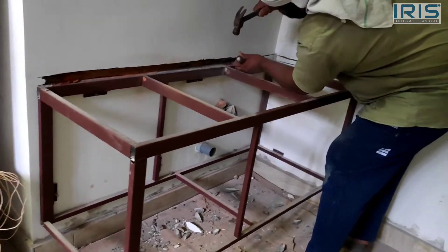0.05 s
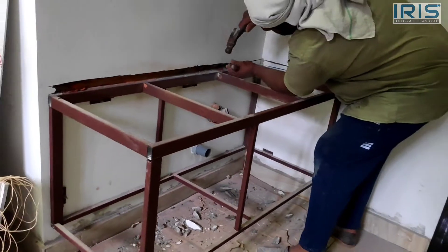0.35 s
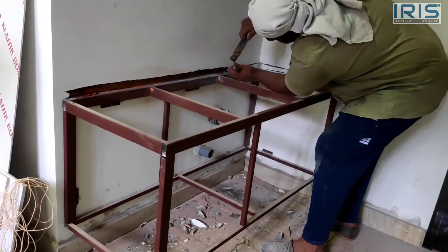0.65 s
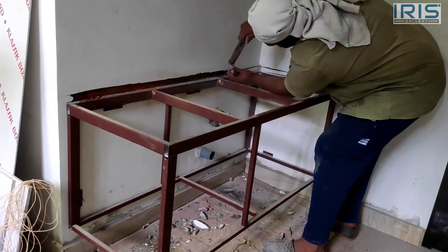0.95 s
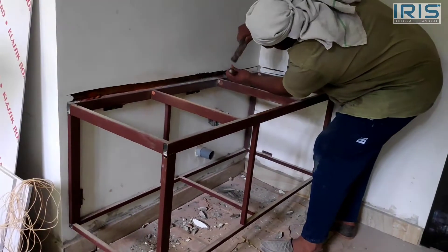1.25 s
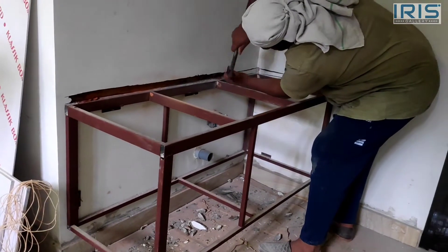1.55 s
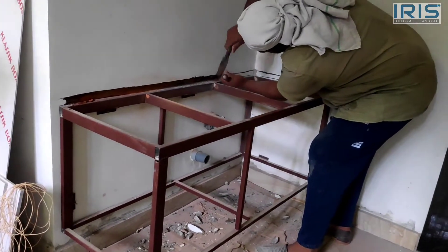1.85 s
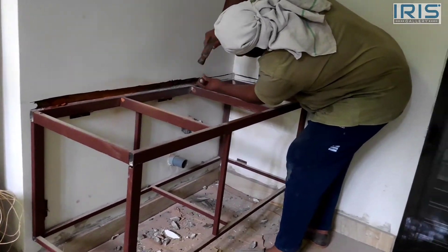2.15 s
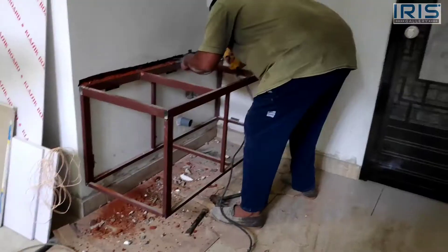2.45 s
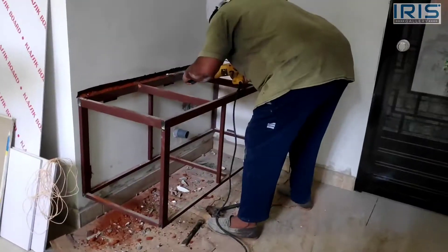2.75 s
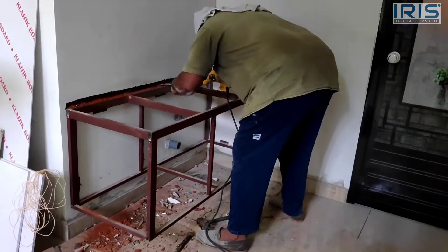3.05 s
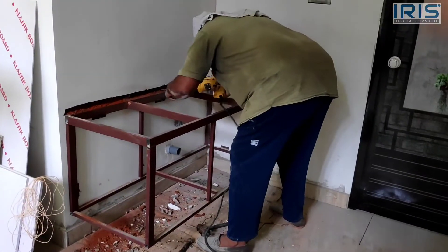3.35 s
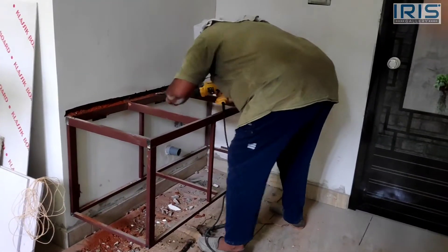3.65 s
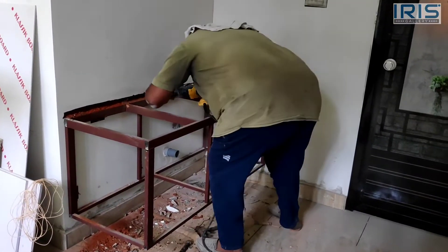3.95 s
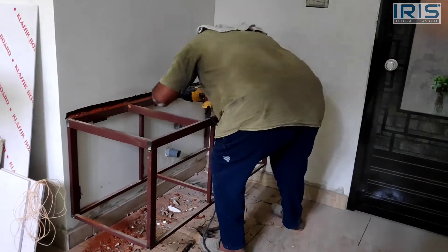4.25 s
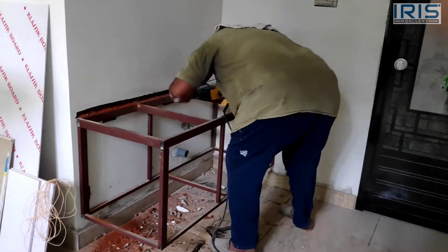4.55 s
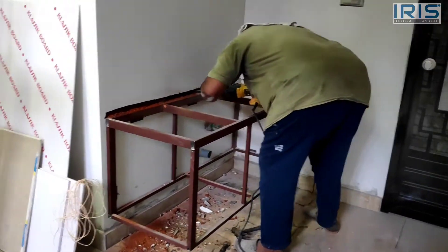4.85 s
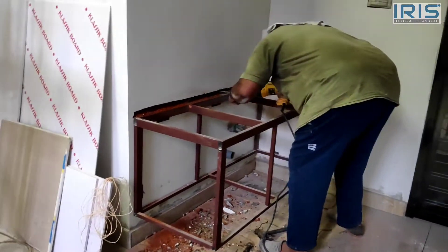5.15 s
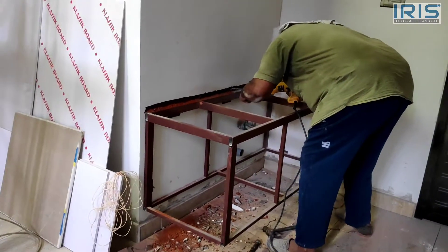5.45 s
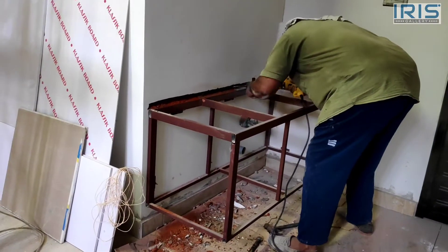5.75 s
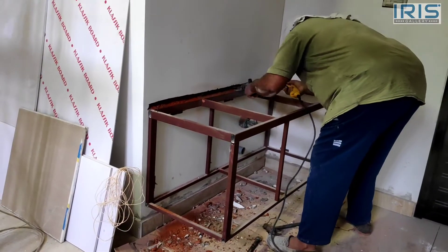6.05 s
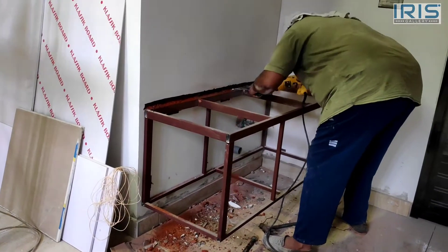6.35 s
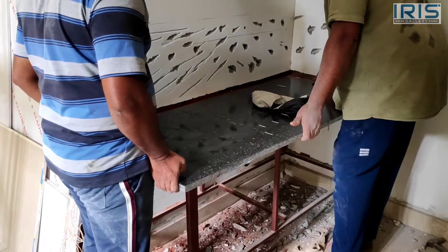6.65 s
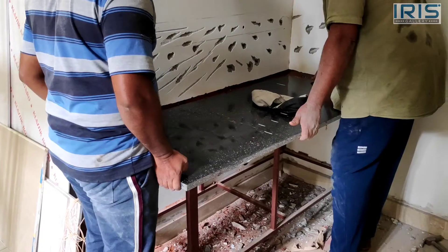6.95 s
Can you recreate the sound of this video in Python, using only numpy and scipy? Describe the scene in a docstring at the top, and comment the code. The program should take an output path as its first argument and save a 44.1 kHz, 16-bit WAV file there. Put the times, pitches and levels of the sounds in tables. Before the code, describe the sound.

In a bare, echoing room, a hammer drives a steel chisel into plaster: two lighter taps, then seven sharp, ringing blows at an even pace. After an abrupt cut, an angle grinder starts in three short bursts and one longer one, rasping against the wall and coasting down with a high, falling whine. Another cut leads to a stone slab scraping briefly over a gritty steel frame, juddering twice. Everything sounds fairly near.

```python
"""Workers fit a stone counter in a bare, echoing room, in three scenes that each end abruptly.
First a hammer drives a steel chisel into a plastered wall: plaster cracks and the chisel rings.
From 2.4 s an angle grinder runs in four bursts, its disc biting the wall and its motor coasting
down with a falling whine. Last, from 6.6 s, the stone slab is pushed over its steel frame,
scraping on grit and juddering twice."""
import sys
import numpy as np
from scipy import signal
from scipy.fft import rfft, irfft, next_fast_len
from scipy.io import wavfile
from scipy.ndimage import minimum_filter1d

SR = 44100
rng = np.random.default_rng(int(sys.argv[2]) if len(sys.argv) > 2 else 0)


def transcribe(signal):
    """Save signal, clipped to [-1, 1], as a 16-bit WAV file at the path in sys.argv[1]."""
    frames = np.atleast_2d(signal).T
    limited = np.clip(frames, -1, 1)
    pcm = np.round(limited * 32767).astype(np.int16)
    wavfile.write(sys.argv[1], SR, pcm)


N = 317065
TIME = np.arange(N) / SR
CUTOFF_HZ = 15450
FREE_TURNS_PER_S, SPIN_UP_S, COAST_S = 278, .065, 1.0   # the grinder's motor


# Where the grinder is heard. Each row: frequency in Hz, left minus right in dB.
GRINDER_BALANCE = [(60, 2), (150, -0.5), (380, 1), (950, -1.5), (2380, 0.5), (5980, 0.5), (15000, -8.5)]

def grinder(throb=0.033, boom_hz=352, gear_order=30):
    """The disc tears grit from the wall once a turn; gears and fan rush; the motor whines."""
    speed, current, load = motor()
    bite_gain, boom_gain, rush_gain, hiss_gain, whine_gain = grinder_levels(speed, current, load)
    turns = np.cumsum(speed * (1 + 0.0013 * drift(150))) / SR
    contact = 1 + throb * np.cos(2 * np.pi * turns)
    grains = grit(per_s=5500, spread_db=3) * contact * from_db(drift(40))
    wobble = disc_wobble(speed, turns, load)
    bite = disc_bite(grains, wobble)
    boom = filtered(bite, lambda hz: 1 / (1 + (hz / boom_hz) ** 10))   # the low part of the bite
    rush, hiss = gears_and_fan(contact)
    out = bite_gain * (bite - boom) + boom_gain * boom + rush_gain * rush + hiss_gain * hiss
    out += whine_gain * from_db(5) * motor_whine(speed, turns)
    out += from_db(-40.5) * wobble   # the disc wobbles even when it runs free
    restart = current * (TIME > TRIGGER_HELD[0][1])   # gears whine when a coasting motor is jolted on
    out += from_db(-40) * restart * np.sin(2 * np.pi * gear_order * turns)
    return placed(out + switch_clicks() + frame_hum(), GRINDER_BALANCE)


# When the trigger is held down. Each row: start and end in seconds.
TRIGGER_HELD = [(2.395, 2.485), (3.103, 3.184), (4.06, 4.154), (4.97, 5.87)]
# How hard the disc works in the one long cut. Each row: time in seconds, share of full load.
DISC_LOAD = [(5.0, 0), (5.06, .22), (5.16, .17), (5.24, 0), (5.29, 0), (5.35, .18), (5.49, .42),
             (5.56, .88), (5.62, .92), (5.7, .55), (5.77, .37), (5.87, .225), (6.0, 0)]

def motor(load_sag=.46):
    """The motor races up while the trigger is held, slows under load, then coasts down."""
    load = np.interp(TIME, *np.transpose(DISC_LOAD))
    speed, current = np.zeros(N), np.zeros(N)   # turns per second; starting current from 0 to 1
    for on_s, off_s in TRIGGER_HELD:
        on, off = int(on_s * SR), int(off_s * SR)
        current[on:off] = (1 - speed[on] / FREE_TURNS_PER_S) * np.exp(-TIME[:off - on] / SPIN_UP_S)
        speed[on:off] = FREE_TURNS_PER_S * (1 - current[on:off]) * (1 - load_sag * load[on:off])
        speed[off:] = speed[off - 1] * np.exp(-TIME[:N - off] / COAST_S)
    return speed, current, load


# The disc pressed to the wall. Each row: start, length and rise time in seconds, bite level in dB,
# wall boom in dB compared with the bite.
WALL_PRESSES = [(2.469, 0.14, 0.052, -38, 0), (2.805, .02, 0.0099, -45.5, -14), (3.156, 0.24, 0.11, -35, 0),
                (4.078, 0.33, 0.073, -50.5, -1), (5.007, 0.11, 0.069, -47, 3),
                (5.206, 0.46, 0.22, -30, -5.5), (5.669, 0.32, 0.021, -33.5, -4),
                (6.126, 0.048, 0.03, -46.5, -2)]

def grinder_levels(speed, current, load):
    """How loud each part is: bite and boom follow pressure; rush, hiss and whine mostly follow speed."""
    air_facing, whine_facing, sparks = from_db(facing_now()[:3])
    pace = lagged(speed / FREE_TURNS_PER_S, 0.023)   # the room takes a moment to fill
    bites, booms = [], []
    for start, length, rise_s, bite_db, boom_db in WALL_PRESSES:
        press = from_db(bite_db) * swell(start, length, rise_s, fall_db_per_s=58.5)
        bites.append(press)
        booms.append(press * from_db(boom_db))
    skipping = from_db(1.3 * drift(50))   # the disc skips over the wall
    bite = together(from_db(-57), *bites) * skipping   # a faint rattle stays between presses
    boom = together(from_db(-52), *booms)
    rush = together(air_facing * from_db(-32) * pace ** 1.97, from_db(-0.5) * bite)
    air = air_facing * from_db(-26) * pace ** 2.135
    hiss = together(air, from_db(-6) * bite, sparks * lagged(current, 0.0057))
    # Cutting smothers the whine: a bite of -35 dB halves it.
    running_free = (1 - lagged(load, SPIN_UP_S)) ** 2 / (1 + (bite / from_db(-35)) ** 2)
    whine = whine_facing * running_free * together(air, from_db(-24) * current)
    return bite, boom, rush, hiss, whine


# The tone of grinding. Each row: frequency in Hz, level in dB.
BITE_TONE = [(60, -38.5), (120, -30.5), (160, -23), (210, 5.5), (270, 0), (400, -3), (650, -1), (1050, -1),
             (1600, -8), (3500, -12), (8000, -7.5), (16000, -62)]
# The notes of the wall and corner under the disc. Each row: pitch in Hz, level in dB.
WALL_NOTES = [(129.2, -61.5), (161.5, -55.5), (263.8, -47.5), (333.8, -45.5), (409.1, -49), (473.7, -47),
              (554.5, -48.5), (662.1, -46), (716.0, -52.5), (748.3, -53), (791.3, -52), (877.5, -50),
              (1017, -45), (1147, -47.5)]

def disc_bite(grains, wobble):
    """Fine grit and coarse chips tear loose while the wall rings and the disc growls."""
    width_hz = 13
    wall = resonate(noise(), [(hz, width_hz, db) for hz, db in WALL_NOTES])
    chips = around(grit(per_s=260, spread_db=-2), centre_hz=3200, steepness=1.7)
    bite = from_db(-4) * (coloured(grains, BITE_TONE) + wall)
    bite += from_db(4.5) * wobble + from_db(-9.5) * chips
    return high_pass(bite, 116)   # a small disc gives off no bass


# The notes of the wobbling disc. Each row: multiple of the disc's speed, level in dB.
WOBBLE_NOTES = [(.5, -14.5), (1, -12), (1.5, -14), (2, -14.5), (3, -21), (4, -25), (5, -22), (6, -20.5)]

def disc_wobble(speed, turns, load):
    """The unbalanced disc hums and chatters every second turn, heard only at speed or under load."""
    snagged = turns + 0.08 * drift(40)   # snagging roughens the higher notes most
    wobble = sum(from_db(db + 2 * drift(14)) * np.sin(2 * np.pi * order * snagged)
                 for order, db in WOBBLE_NOTES)
    return wobble * np.minimum(speed / 250 + load, 1) ** 5


# The tones of the rushing gears and fan, and of the hissing air. Each row: frequency in Hz, level in dB.
RUSH_TONE = [(300, -59.5), (800, -10), (1400, 3), (2000, 1), (2700, 3), (3600, 3.5), (5000, -3.5),
             (7000, -7.5), (10000, -16), (16000, -32)]
HISS_TONE = [(1500, -13), (4000, 1), (5500, 2), (8000, 0.5), (10000, 1.5), (12300, 5.5), (14000, 2),
             (16000, -2.5)]
# The notes of the rubbing disc. Each row: pitch in Hz, width in Hz, level in dB.
DISC_NOTES = [(1233, 27, -1), (1355, 40, 4.5), (1460, 45, 0.5), (1891, 35, 5.5), (2240, 72, -3.5),
              (2650, 32, 5.5), (3395, 32, 6)]

def gears_and_fan(contact):
    """A grainy rush, in which the disc sings in brief spells, and a smooth hiss of air."""
    rush = coloured(grit(per_s=14000, spread_db=-1.5) * contact, RUSH_TONE)
    rush *= from_db(3 + .5 * drift(35))
    hiss = coloured(noise(), HISS_TONE) * from_db(3.5 + drift(45))
    singing = from_db(-4.5 + 2 * drift(13)) * resonate(noise(), DISC_NOTES)
    return rush + singing, hiss


def motor_whine(speed, turns, cycles_per_turn=80, echo_t60=.16, flutter_db=3):
    """A fluttering whine, loudest as it passes the housing's own pitch; echoes smear the glide."""
    housing_hz, width_hz = facing_now()[-2:]
    pitch_hz = cycles_per_turn * speed
    housing = 1 / (1 + ((pitch_hz - housing_hz) / (width_hz / 2)) ** 2) ** 2
    flutter = from_db(flutter_db * drift(30))
    tone = flutter * housing * np.sin(2 * np.pi * cycles_per_turn * turns) * (pitch_hz < CUTOFF_HZ)
    echoes = energy_one(noise(SR // 2) * dying(echo_t60, SR // 2))
    return from_db(-15) * tone + from_db(1) * signal.fftconvolve(tone[None], echoes, axes=-1)[:, :N]


# How the grinder sounds in each burst. Each row: air and gear noise, motor whine and brush sparks
# in dB, then the pitch and width of the housing's ring in Hz.
BURST_FACING = [(-6, -35, -67, 12400, 4200), (0, 1.5, -37, 13000, 6600), (-0.5, 0, -31, 13200, 5700),
                (-0.5, -0.5, -29.5, 13500, 5000)]

def facing_now():
    """The tool is turned a new way for each burst; give the settings in use at each moment."""
    starts = np.array(TRIGGER_HELD)[:, 0]
    burst = np.maximum(np.searchsorted(starts, TIME) - 1, 0)
    return np.array(BURST_FACING)[burst].T


# Clicks on starting. Each row: start and length in seconds, level in dB, centre pitch in Hz.
START_CLICKS = [(3.113, .005, -35, 12800), (4.93, .006, -42.5, 6500)]

def switch_clicks():
    """The switch and gears click as the tool is started."""
    return sum(from_db(db) * swell(start, length, rise_s=.003) * around(noise(), hz, steepness=7.9)
               for start, length, db, hz in START_CLICKS)


# Shakes of the steel frame. Each row: start in seconds, level of the low and of the high notes in dB.
FRAME_SHAKES = [(2.5, -43.5, -48), (3.249, -57, -40)]
# The frame's notes, in a low and a high group. Each row: pitch in Hz, level in dB, ring time in seconds.
FRAME_NOTES = [
    [(109.5, -17, 8.8), (159, -21, 2.8), (215, -8.5, 3.1), (266, -1, 2.05), (308, -3.5, 1.4)],
    [(339, 4, 1.4), (454, -11, 1)],
]

def frame_hum():
    """The steel frame hums on after the bites of the first two bursts."""
    out = np.zeros(N)
    for start, *groups_db in FRAME_SHAKES:
        for shake_db, group in zip(groups_db, FRAME_NOTES):
            for hz, db, t60 in group:
                hum = np.sin(2 * np.pi * (hz * TIME + .05 * drift(12)))
                out += from_db(shake_db + db) * swell(start, 0, rise_s=0.1, fall_db_per_s=60 / t60) * hum
    return out


# Where the chisel is heard. Each row: frequency in Hz, left minus right in dB.
CHISEL_BALANCE = [(60, -11), (150, 1), (380, -1), (950, -0.5), (2380, 0), (5980, 2.5), (15000, -4)]

def chiselling():
    """Blows and tip scratches, held down by a gain control, with small knocks among them."""
    scratches = tip_scratches()
    work = placed(hammer() + scratches, CHISEL_BALANCE)
    return gain_control(work) + wall_knocks()


# Hammer blows. Each row: start in seconds, force in dB, then in dB compared with that force:
# the wall's thud, the direct sound, and each of the chisel's five groups of notes.
HAMMER_BLOWS = [(0.006, -6.5, -6.5, -25, -24, -30, -30, -30, -30),
                (0.263, -20.5, 1.5, -19, -25, -20, -25, -25, -25),
                (0.8744, 9.5, -17.5, -13, -10.5, -8.5, -25, -10, -15),
                (1.1204, 13.5, -16.5, -27, -7.5, -3.5, -14, -9, -12),
                (1.3443, 13, -12.5, -20, -9.5, -4, -21, -13, -17),
                (1.5794, 15.5, -12.5, -26, -11, -5.5, -14, -13, -17),
                (1.8064, 14.5, -8, -14, -14, -8, -7, -2, -20),
                (2.034, 13.5, -7, -23, -5.5, -4.5, -10, -13, -5),
                (2.2646, 11, -10, -27, -8.5, -11, -10, -10, -4)]
# The tone of the wall's thud. Each row: frequency in Hz, level in dB.
THUD_TONE = [(50, -35), (110, -23), (170, -7.5), (260, 1.5), (420, -1.5), (500, -3.5), (630, 1.5),
             (800, -5.5), (1050, 1), (1600, 2), (1850, -5), (2500, -1.5), (4000, -1), (9000, -8)]

def hammer(thud_t60=0.19, tick_t60=.012):
    """Each blow cracks plaster, thuds in the wall and rings the chisel, whose tip snaps in with a tick."""
    struck, direct, size = np.zeros(N), np.zeros(N), SR // 2
    for start_s, force_db, thud_db, direct_db, *rings_db in HAMMER_BLOWS:
        blow = plaster_crack(size)
        thud = coloured(rng.standard_normal(size), THUD_TONE) * dying(thud_t60, size)
        blow += from_db(thud_db) * energy_one(thud) + chisel_ring(rings_db, size)
        tick = around(rng.standard_normal(size), centre_hz=5600, steepness=1.4) * dying(tick_t60, size)
        close = from_db(direct_db) * blow + from_db(-20) * energy_one(tick)
        start = round(start_s * SR)
        struck[start:start + size] += from_db(force_db) * blow
        direct[start:start + size] += from_db(force_db) * close
    return high_pass(corner(direct) + room(struck), 140)   # a small tip gives off no bass


# The tone of the crack. Each row: frequency in Hz, level in dB.
CRACK_TONE = [(300, -37), (900, -16.5), (1700, -9.5), (2900, -10.5), (3900, 1), (5400, 0), (7000, 0),
              (7900, 1), (9200, 6.5), (10300, 7), (11200, 1), (13300, 3), (15000, 0.5)]

def plaster_crack(size, crack_t60=0.014, crumble_t60=0.044):
    """Steel meets steel for a few milliseconds, and plaster crumbles just after."""
    fade = dying(crack_t60, size) + from_db(-5) * dying(crumble_t60, size)
    spectrum = rfft(rng.standard_normal(size) * fade)
    flat = spectrum / np.abs(spectrum)   # every frequency equally strong
    tone = from_db(at_hz(CRACK_TONE, np.fft.rfftfreq(size, 1 / SR)))
    return energy_one(irfft(flat * tone, size) * dying(10 * crack_t60, size))


# The chisel's notes, in five groups from low to high.
# Each row: pitch in Hz, level in dB, ring time in seconds.
CHISEL_NOTES = [
    [(1610, -18.5, 0.082), (4673, -1, 0.041), (4880, -8, .025)],
    [(5770, -13.5, 0.02), (6920, -9.5, 0.032), (8700, -18, 0.032), (9200, -7, 0.023), (9280, -4, .02),
     (10220, 2, 0.018), (10630, -11.5, 0.012)],
    [(11730, -2, .04)],
    [(14300, -12, .02), (14640, -2, .013)],
    [(14850, -8, .02), (15500, 1.5, 0.025)],
]

def chisel_ring(groups_db, size, ring_db=-0.5, detune=.001, spread_db=1):
    """The steel rings a little differently at each blow as the grip shifts."""
    out = np.zeros(size)
    for group_db, group in zip(groups_db, CHISEL_NOTES):
        for hz, db, t60 in group:
            gripped_hz = hz * (1 + detune * rng.standard_normal())
            note = np.sin(2 * np.pi * (gripped_hz * TIME[:size] + rng.random())) * dying(t60, size)
            grip_db = spread_db * rng.standard_normal()
            out += from_db(ring_db + group_db + db + grip_db) * energy_one(note)
    return out


# Strokes of the chisel's tip. Each row: start and length in seconds, level in dB.
TIP_STROKES = [(0.272, 0.059, -53), (0.483, 0.12, -54.5), (0.724, 0.027, -59.5)]
# The tone of those strokes. Each row: frequency in Hz, level in dB.
TIP_TONE = [(59, -35.5), (100, -10.5), (238, -10.5), (275, -4), (362, -5.5), (457, -12.5), (601, -4),
            (727, -7.5), (1230, -12), (2370, -29), (3180, -8), (6120, -21.5), (15500, -17.5)]

def tip_scratches():
    """The tip scratches over the plaster for a new hold."""
    strokes = sum(from_db(db) * swell(start, length, rise_s=0.033, fall_db_per_s=81)
                  for start, length, db in TIP_STROKES)
    return strokes * coloured(grit(per_s=6600, spread_db=-2), TIP_TONE)


# Small knocks. Each row: start and length in seconds, level in dB, centre pitch in Hz, narrowness.
WALL_KNOCKS = [(0.006, 0.014, -40.5, 1680, 1.9), (0.006, .015, -42.5, 6140, 7.2),
               (0.007, 0.15, -58.5, 925, 31), (0.148, 0.036, -62.5, 90, 1.8),
               (0.261, 0.0036, -50, 1700, 2.8), (1.417, 0.12, -46, 229, 1.35)]

def wall_knocks():
    """Light knocks and taps on the wall, each a short band of noise."""
    field = noise()
    return sum(from_db(db) * swell(start, length, rise_s=length / 10) * around(field, hz, narrowness)
               for start, length, db, hz, narrowness in WALL_KNOCKS)


def gain_control(x, threshold_db=-23, window_s=0.0015, attack_s=.0007, hold_s=0.0088,
                 release_db_per_s=163):
    """Loud sound quickly pulls the volume down; it holds briefly, then recovers while the echo dies."""
    level_db = 10 * np.log10(lagged(np.mean(x ** 2, axis=0), window_s) + 1e-12)
    excess_db = np.maximum(level_db - threshold_db, 0)
    half = int(hold_s * SR / 2)
    held_db = -minimum_filter1d(-excess_db, 2 * half + 1, origin=half, mode="nearest")
    recovery_db = release_db_per_s * TIME
    cut_db = np.maximum.accumulate(held_db + recovery_db) - recovery_db
    return x * from_db(-lagged(cut_db, attack_s))


# Pushes on the slab. Each row: start and length in seconds, gritty hiss and frame rumble in dB.
SLAB_SHOVES = [(6.53, 0.87, -51, -51), (6.712, 0.096, -45, -50.5)]
# Moments when it catches. Each row: start and length in seconds, level in dB, centre pitch in Hz.
SLAB_JUDDERS = [(6.974, 0.065, -43, 940), (7.127, 0.032, -40.5, 450)]
# The stone's notes. Each row: pitch in Hz, width in Hz, level in dB.
STONE_NOTES = [(382, 27, -3), (738, 27, 0), (1090, 100, -7), (1290, 63, -12), (1580, 94, -14),
               (1840, 47, -12)]
# The tones of the scraping grit and of the rumbling frame. Each row: frequency in Hz, level in dB.
SCRAPE_TONE = [(150, -43), (250, -18), (414, -1), (507, -7), (978, -7.5), (1080, -32), (1280, -3),
               (1490, -19), (2700, -13), (3830, -5), (5500, -11.5), (8000, -8.5), (11300, -21),
               (14000, -31)]
RUMBLE_TONE = [(30, -3), (75, 2), (105, -10), (133, 9), (165, 0), (230, -5.5), (290, -12), (400, -14),
               (900, -19)]
# Where the slab is heard. Each row: frequency in Hz, left minus right in dB.
SLAB_BALANCE = [(60, 0.5), (380, -1.7), (2380, 0.16), (15000, 0.99)]

def slab():
    """Stone slides on grit, the frame rumbles, and twice the slab catches and judders."""
    out, hiss_gain, rumble_gain = 0, 0, 0
    for start, length, hiss_db, rumble_db in SLAB_SHOVES:
        shove = swell(start, length, rise_s=0.042, fall_db_per_s=76)
        hiss_gain = together(hiss_gain, from_db(hiss_db) * shove)
        rumble_gain = together(rumble_gain, from_db(rumble_db) * shove)
    for start, length, db, hz in SLAB_JUDDERS:
        judder = from_db(db) * swell(start, length, rise_s=0.019)
        stone = resonate(grit(per_s=1600, spread_db=2.5), STONE_NOTES)
        out += judder * around(stone, hz, steepness=1.5)
        hiss_gain = together(hiss_gain, judder)
        rumble_gain = together(rumble_gain, from_db(1.5) * judder)
    out += hiss_gain * coloured(grit(per_s=6000, spread_db=0), SCRAPE_TONE)
    out += rumble_gain * coloured(noise(), RUMBLE_TONE)
    out += from_db(-16) * hiss_gain * resonate(noise(), STONE_NOTES)   # the sliding stone sings faintly
    return placed(out, SLAB_BALANCE)


# First echoes. Each row: delay in seconds, level in dB compared with the direct sound.
CORNER_ECHOES = [(.0034, -13), (.0075, -2)]

def corner(x):
    """The direct sound and its echoes from the corner, which reach each ear at slightly different times."""
    out = np.array([x, x])
    for delay_s, db in CORNER_ECHOES:
        for ear in out:
            lag = int(delay_s * rng.uniform(.85, 1.15) * SR)
            ear[lag:] += from_db(db) * x[:-lag]
    return out


# How long the room echoes. Each row: frequency in Hz, seconds to fade by 60 dB.
ECHO_TIMES = [(150, 1.4), (500, 1.05), (1500, 0.68), (4500, 0.72), (9000, 0.48), (15000, 0.55)]

def room(x, early_db=-13.5, early_t60=0.19):
    """The bare walls return a cluster of early echoes and a tail that dies sooner in the treble."""
    field, tail = noise(SR), 0
    centres, fade_times = np.transpose(ECHO_TIMES)
    for share, t60 in zip(np.eye(len(centres)), fade_times):
        band = filtered(field, lambda hz: at_hz(np.c_[centres, share], hz))
        tail += band * dying(t60, SR)
    early = noise(SR) * dying(early_t60, SR)
    response = energy_one(tail) + from_db(early_db) * energy_one(early)
    return signal.fftconvolve(x[None], response, axes=-1)[:, :N]


# The tone of the room's background. Each row: frequency in Hz, level in dB.
BACKGROUND_TONE = [(20, 3.5), (35, -38.5), (52, 6.5), (80, -13), (150, -14.5), (300, -17.5), (700, -21),
                   (2000, -12), (6000, -13), (16000, -17.5)]

def room_background():
    """A faint, steady rumble and hiss."""
    return from_db(-55) * coloured(noise(), BACKGROUND_TONE)


# How alike the two ears hear the room. Each row: frequency in Hz, likeness from 0 to 1.
EAR_LIKENESS = [(100, 0.93), (250, 0.97), (500, 0.89), (1000, 0.76), (2000, 0.064), (4000, 0.068),
                (8000, 0.047), (15000, 0.017)]

def diffuse(pair):
    """Two unrelated signals become room sound: alike in the bass, unrelated in the treble."""
    signs = np.array([[1], [-1]])
    mid, side = filtered(pair, lambda hz: np.sqrt(1 + signs * at_hz(EAR_LIKENESS, hz)))
    return np.array([mid + side, mid - side]) / np.sqrt(2)


def noise(size=N):
    """Stereo noise that fills the room."""
    return diffuse(rng.standard_normal((2, size)))


def grit(per_s, spread_db):
    """Mineral grains of uneven size break at random."""
    breaks = rng.random((2, N)) < per_s / SR
    sizes = rng.standard_normal((2, N)) * from_db(spread_db * rng.standard_normal((2, N)))
    return rms_one(diffuse(breaks * sizes))


def drift(turns_per_s):
    """A random wander of typical size 1."""
    points = rng.standard_normal(N // 8)
    return rms_one(np.interp(TIME * turns_per_s, np.arange(len(points)), points))


def swell(start, length, rise_s, fall_db_per_s=220):
    """A rise, a hold, and a fall."""
    rise = np.clip((TIME - start) / rise_s, 0, 1)
    return rise * from_db(-fall_db_per_s * np.maximum(TIME - start - length, 0))


def dying(t60, size):
    """A fade that loses 60 dB every t60 seconds."""
    return np.exp(-np.log(1000) * TIME[:size] / t60)


def lagged(x, lag_s):
    """Follow a changing value smoothly, a little late."""
    r = np.exp(-1 / (lag_s * SR))
    return signal.lfilter([1 - r], [1, -r], x)


def resonate(x, notes):
    """Let a sound ring an object's notes; the narrower a note, the longer it rings."""
    out = 0
    for hz, width_hz, db in notes:
        r = np.exp(-np.pi * width_hz / SR)
        gain = (1 - r * r) / 2
        feedback = [1, -2 * r * np.cos(2 * np.pi * hz / SR), r * r]
        out += from_db(db) * signal.lfilter([gain, 0, -gain], feedback, x)
    return rms_one(out)


def filtered(x, gain_at):
    """Turn each frequency up or down."""
    size = next_fast_len(x.shape[-1])
    gains = gain_at(np.fft.rfftfreq(size, 1 / SR))
    return irfft(rfft(x, size) * gains, size)[..., :x.shape[-1]]


def coloured(x, tone):
    """Shape a sound with a tone table, at level 1."""
    return rms_one(filtered(x, lambda hz: from_db(at_hz(tone, hz))))


def around(x, centre_hz, steepness):
    """Keep a band around one pitch, at level 1."""
    return rms_one(filtered(x, lambda hz: 1 / (1 + (steepness * np.log((hz + 1) / centre_hz)) ** 2)))


def placed(x, balance):
    """Lean each frequency to the left or right."""
    return filtered(x, lambda hz: from_db(np.array([[.5], [-.5]]) * at_hz(balance, hz)))


def low_pass(x, hz):
    """Cut the treble steeply."""
    return signal.sosfilt(signal.ellip(12, .1, 80, hz, fs=SR, output="sos"), x)


def high_pass(x, hz):
    """Cut the bass."""
    return signal.sosfilt(signal.butter(4, hz, "high", fs=SR, output="sos"), x)


def at_hz(table, hz):
    """Read between a table's rows, with octaves evenly spaced."""
    frequencies, values = np.transpose(table)
    return np.interp(np.log(hz + 0.00094), np.log(frequencies), values)


def from_db(db):
    """Turn decibels into a multiplier."""
    return 10 ** (np.asarray(db) / 20)


def rms_one(x):
    """Scale to an average (rms) level of 1."""
    return x / np.sqrt(np.mean(x ** 2) + 1e-20)


def energy_one(x):
    """Scale to an energy of 1 per channel."""
    return rms_one(x) / np.sqrt(x.shape[-1])


def together(*gains):
    """Unrelated sounds add in power."""
    return np.sqrt(sum(gain ** 2 for gain in gains))


def heard_during(span, fade_in_s, cut_s=0.0011):
    """Fade in, stay, then stop abruptly."""
    start, end = span
    return np.clip((TIME - start) / fade_in_s, 0, 1) ** 2 * np.clip(1 - (TIME - end) / cut_s, 0, 1)


# When chisel, grinder and slab are heard. Each row: start and end in seconds.
SCENE_SPANS = [(0, 2.328), (2.38, 6.461), (6.555, 7.2)]

def scene():
    """Chisel, grinder and slab in turn, each over the room's background."""
    chisel_span, grinder_span, slab_span = SCENE_SPANS
    background = room_background()
    out = heard_during(chisel_span, fade_in_s=0.0011) * (chiselling() + background)
    out += heard_during(grinder_span, fade_in_s=0.047) * (grinder() + background)
    out += heard_during(slab_span, fade_in_s=0.12) * low_pass(slab() + background, hz=14400)
    return out


def record(dry):
    """The highest treble is cut away."""
    return low_pass(dry, CUTOFF_HZ)


dry = scene()
out = record(dry)
transcribe(out)
```